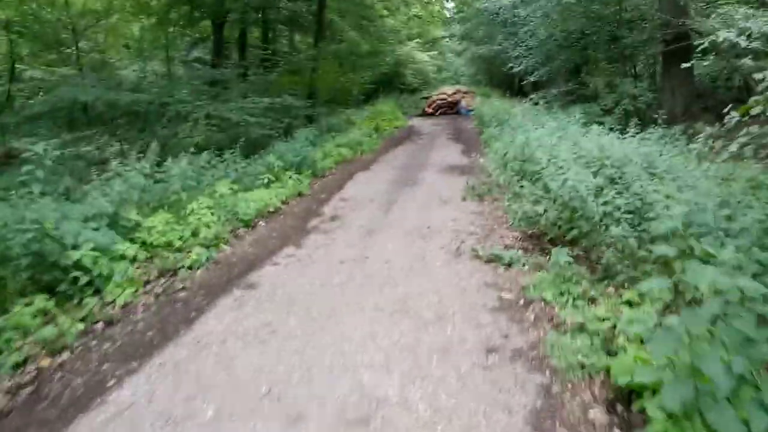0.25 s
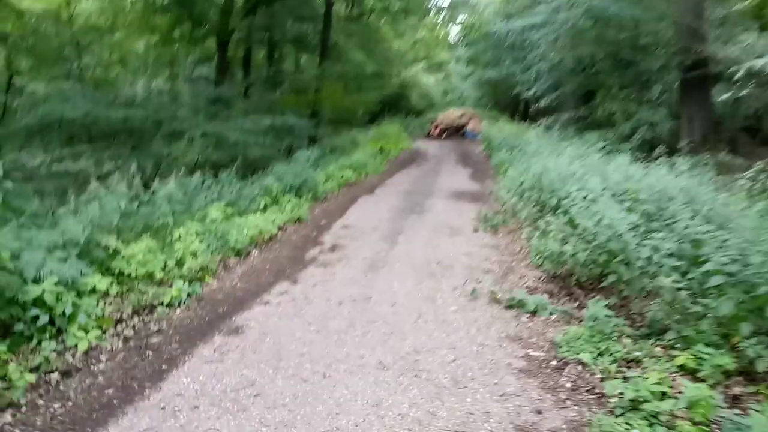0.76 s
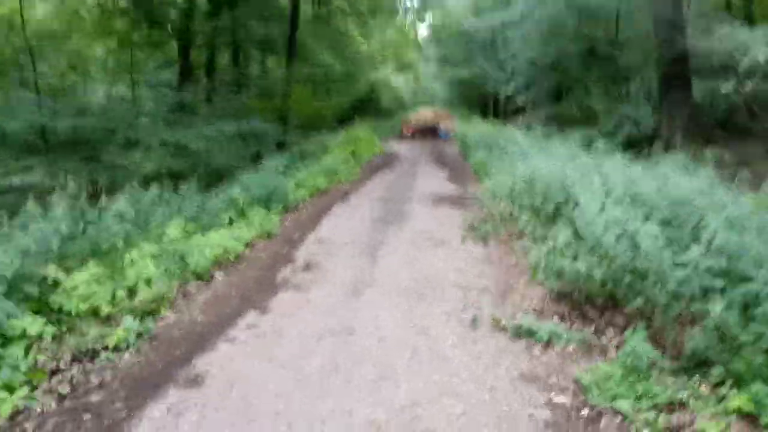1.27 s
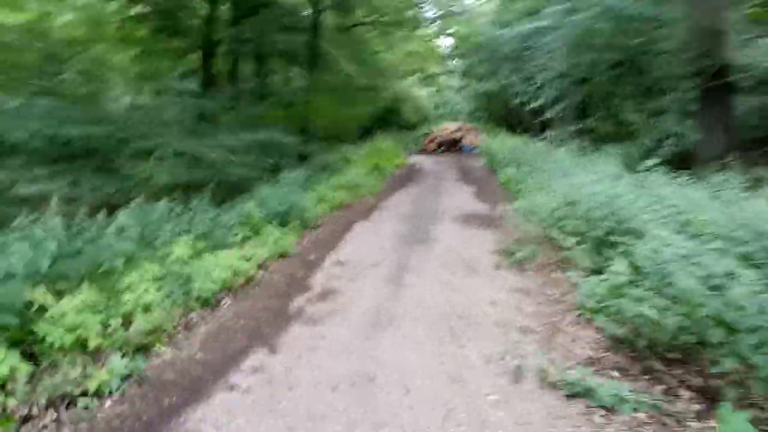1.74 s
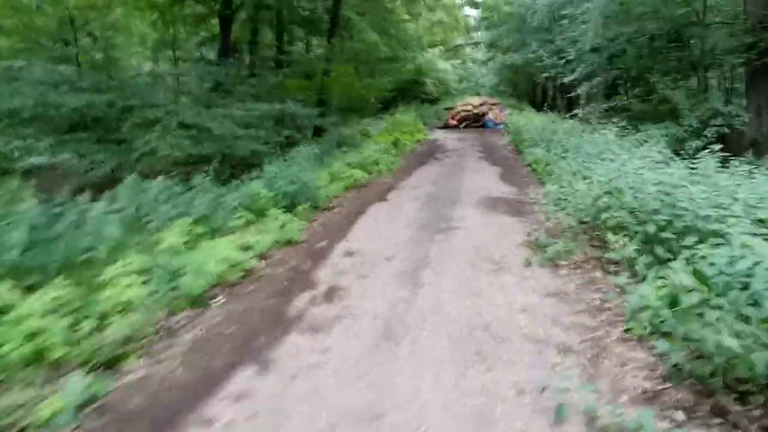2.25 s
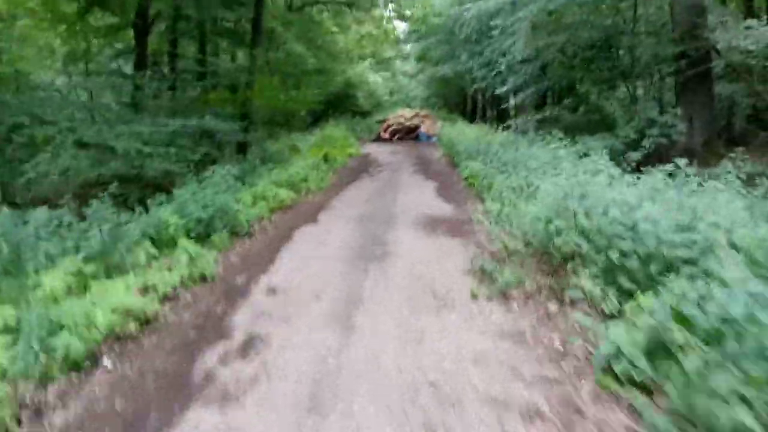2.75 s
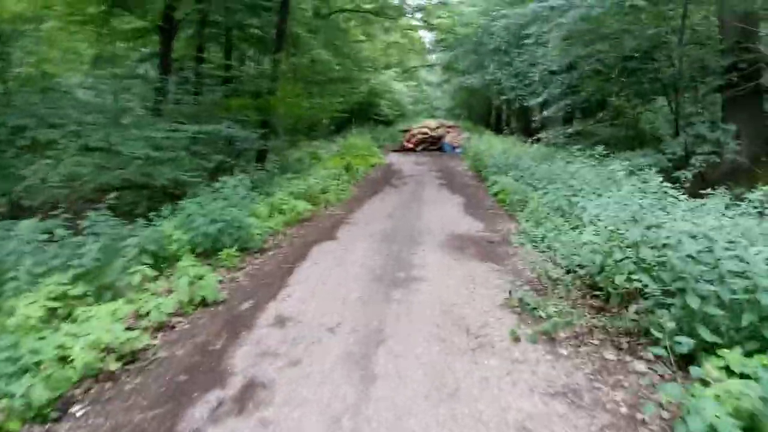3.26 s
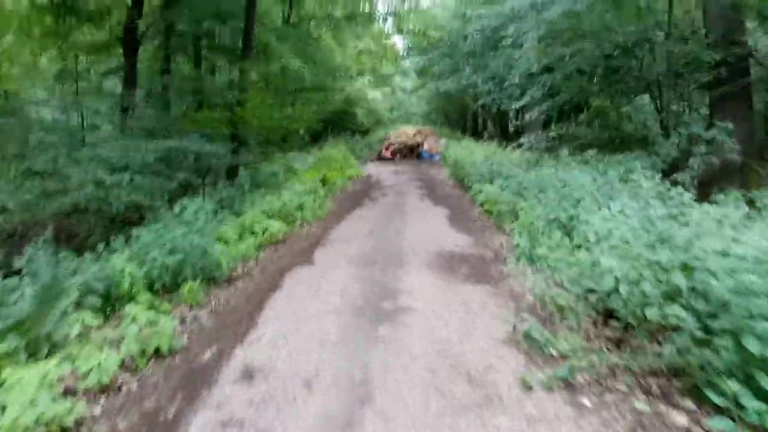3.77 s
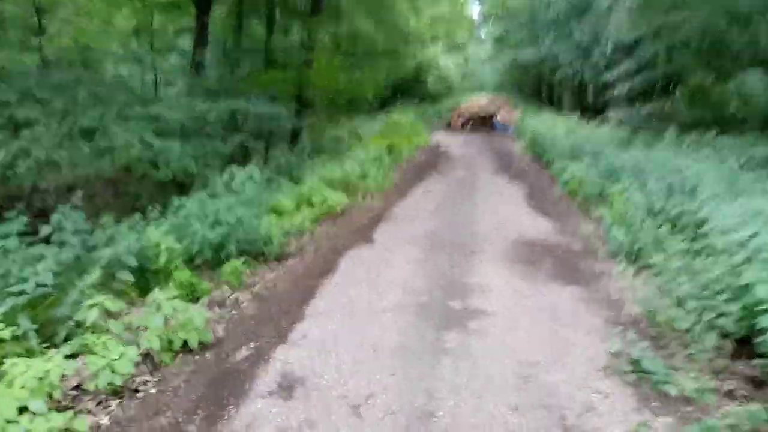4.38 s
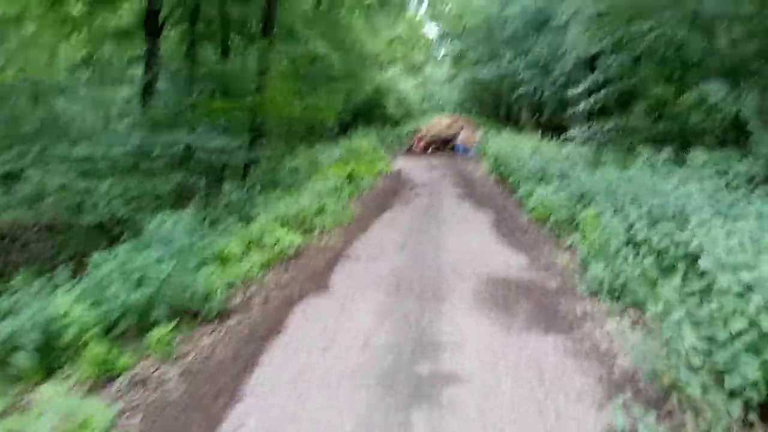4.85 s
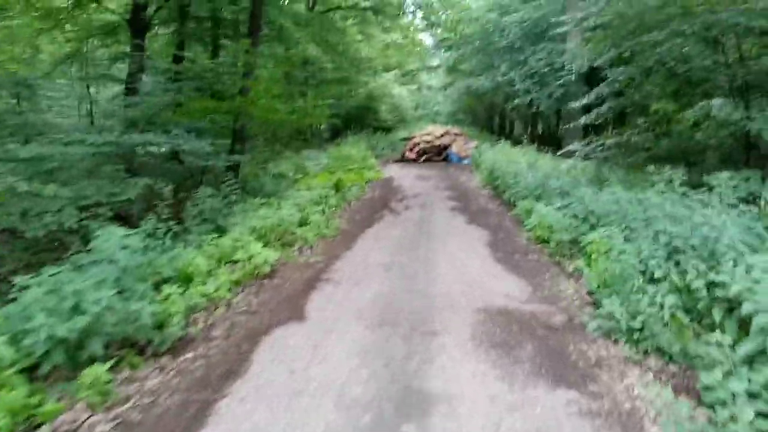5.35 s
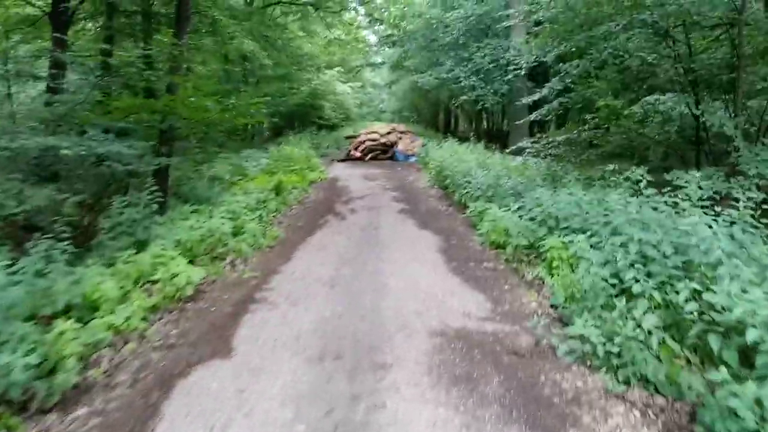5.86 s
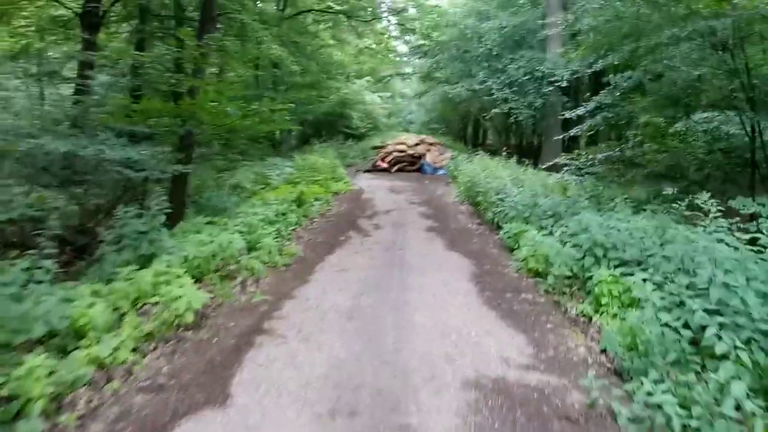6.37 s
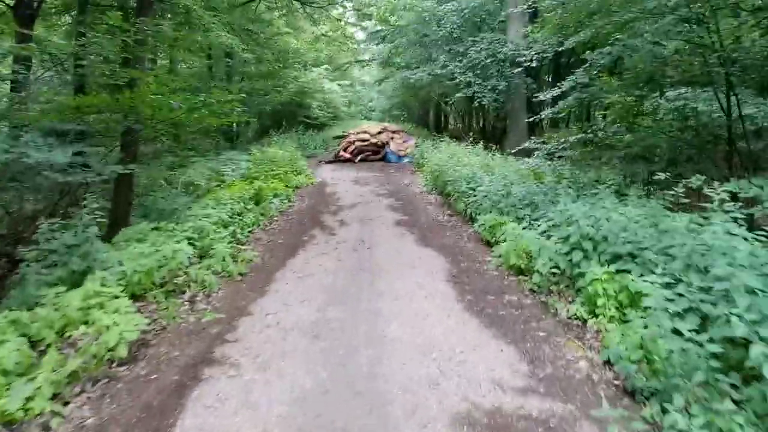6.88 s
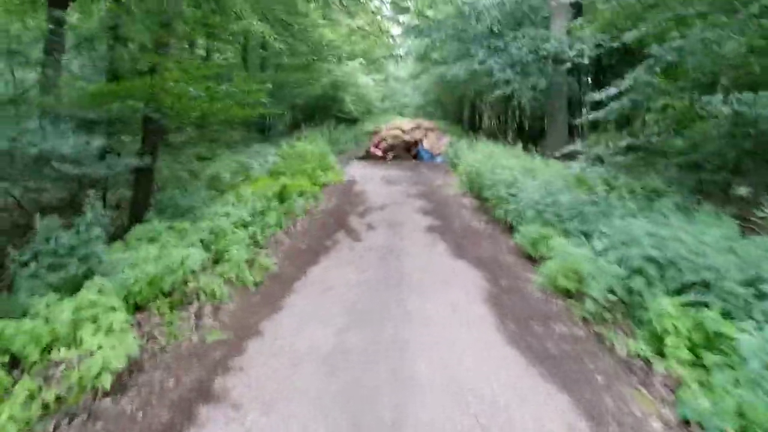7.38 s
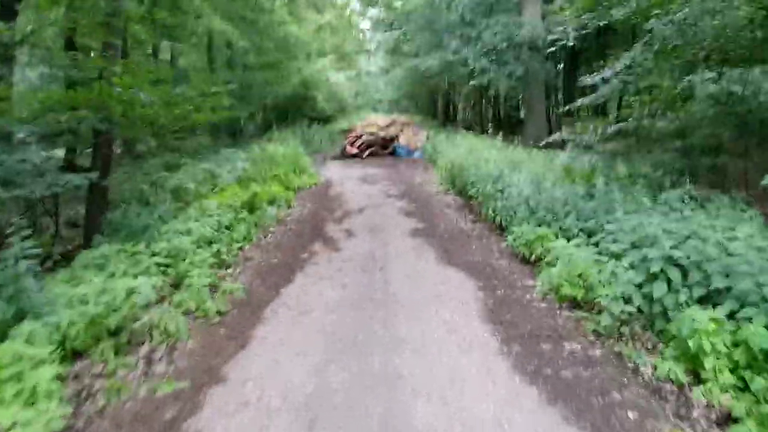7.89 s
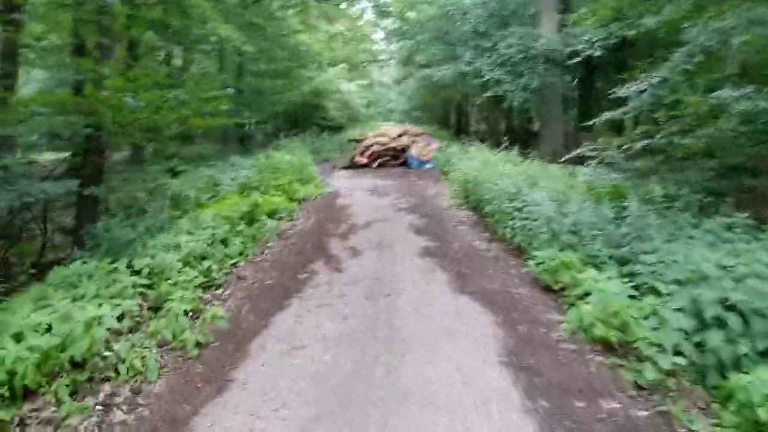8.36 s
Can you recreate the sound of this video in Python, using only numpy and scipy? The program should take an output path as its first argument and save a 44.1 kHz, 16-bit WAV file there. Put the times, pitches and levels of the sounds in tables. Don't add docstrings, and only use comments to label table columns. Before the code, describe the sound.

A walker's shoes press fine gravel about twice a second, each step a soft thud and gritty crunch with small pebble ticks. Birds whistle, chip and chatter nearby, echoing among trees over a blurred distant chorus. Sticks knock sharply early on; later a twig snaps loudly close by, followed by creaking and clattering wood. Faint rumble, leaf noise and hiss lie beneath, heard in mono from a small handheld microphone.

```python
import sys
import numpy as np
from scipy import signal
from scipy.fft import rfft, irfft, next_fast_len
from scipy.io import wavfile
from scipy.ndimage import uniform_filter1d, map_coordinates

SR = 44100
rng = np.random.default_rng(int(sys.argv[2]) if len(sys.argv) > 2 else 0)


def gain_from_db(level_db):
    decades = np.asarray(level_db, float) / 20
    return 10 ** decades


def wrap_up_sound(samples):
    columns = np.atleast_2d(samples).T
    tamed = np.clip(columns, -1, 1)
    steps = np.round(tamed * 32767).astype(np.int16)
    wavfile.write(sys.argv[1], SR, steps)


N = 380297


def unit(x):
    return x / np.sqrt(np.mean(x ** 2))


def colour(x, points):
    hz, db = np.transpose(points)
    size = next_fast_len(N)
    axis = np.log(np.arange(size // 2 + 1) * SR / size + 1)
    gain = gain_from_db(np.interp(axis, np.log(hz), db))
    return irfft(rfft(x, size) * gain, size)[:N]


def walk(rate_hz):
    hold = int(SR / rate_hz)
    steps = np.repeat(rng.standard_normal(N // hold + 1), hold)
    return 1.318 * uniform_filter1d(uniform_filter1d(steps, hold), hold)[:N]


def add(out, s, sound):
    i = int(s * SR)
    out[i:i + len(sound)] += sound[:N - i]


def ring(hz, t60_s, rise_cycles=0.2):
    t = np.arange(SR // 16) / SR
    contact = 1 - np.exp(-t * hz / rise_cycles)
    decay = np.exp(-np.log(1000) * t / t60_s)
    y = contact * decay * np.sin(2 * np.pi * hz * t)
    return y / np.abs(y).max()


def whistle(length_s, hz, waver, lean=0.57):
    flutter_db, wobble = 4.0, 0.007
    u = np.linspace(-1, 1, int(length_s * SR))
    start, middle, end = hz
    pitch = middle + (end - start) / 2 * u + ((start + end) / 2 - middle) * u ** 2
    shake = waver[:len(u)]
    swell = np.clip(1 - u ** 2, 0, 1) ** 0.46 * np.exp(-lean * u)
    phase = 2 * np.pi * np.cumsum(pitch * (1 + wobble * shake)) / SR
    return 2.14 * swell * gain_from_db(flutter_db * shake[::-1]) * np.sin(phase)


def birds(song, lean=0.6):
    out, waver = np.zeros(N), np.tile(walk(150), 2)
    for s, length, *hz, db in song:
        shake = min(length / 0.1, 1) * waver[int(s * SR):][:SR // 4]
        add(out, s, gain_from_db(db) * whistle(length, hz, shake, lean))
    return out


def slurred(s, length, hz, slide, db):
    return s, length, hz - slide / 2, hz, hz + slide / 2, db


def trunks(x, count=2):
    wood_t60_s, treble_t60_s, sway_samples = 0.7, 0.46, 35.0
    t = np.arange(int(1.1 * SR)) / SR
    build = 1 - np.exp(-t / 0.015)
    wood_decay, treble_decay = gain_from_db(-60 * t / wood_t60_s), gain_from_db(-60 * t / treble_t60_s)
    low = signal.butter(2, 6500, fs=SR, output="sos")
    out = 0
    for _ in range(count):
        noise = rng.standard_normal(len(t))
        dull = signal.sosfilt(low, noise)
        tail = build * (dull * wood_decay + (noise - dull) * treble_decay)
        heard = signal.fftconvolve(x, tail)[:N]
        out = out + map_coordinates(heard, [np.arange(N) + sway_samples * walk(7)], order=2)
    return out / np.sqrt(count * np.sum((build * wood_decay) ** 2))


def foliage(x):
    spread_s, direct = 0.0082, 0.49
    t = np.arange(SR // 16) / SR
    spray = rng.standard_normal(len(t)) * np.exp(-t / spread_s)
    spray = spray / np.sqrt(np.sum(spray ** 2))
    return direct * x + 0.5 * signal.fftconvolve(x, spray)[:N]


# start in seconds, length in seconds, level in dB.
SCUFFS = [
    (0, 0.072, -58.5),
    (2.541, 0.088, -60.5),
    (4.662, 0.12, -65),
    (8.129, 0.11, -61),
]
# start in seconds, heel level in dB, heel ring in Hz, sole roll in seconds, grit level in dB.
FOOTFALLS = [(.482, -48.5, 103, 0.2, -60.5), (1.009, -47, 164, 0.19, -63), (1.558, -42.5, 145, 0.22, -63),
             (2.079, -55, 159, 0.3, -62), (2.628, -41.5, 115, .22, -59.5), (3.161, -41.5, 148, 0.18, -58.5),
             (3.72, -50, 202, 0.19, -60), (4.337, -60, 159, 0.085, -59.5), (4.795, -46, 205, 0.17, -59.5),
             (5.398, -66, 150, 0.16, -63.5), (5.894, -64, 150, 0.19, -64.5), (6.418, -50, 167, .23, -63.5),
             (6.99, -58, 104, 0.2, -65), (7.47, -62, 150, .31, -67), (7.979, -47, 191, 0.14, -60.5),
             (8.533, -66, 150, 0.098, -76)]
# frequency in Hz, density in dB per Hz.
GRIT = [(200, 0), (500, 9), (1000, -3), (2000, 0), (3500, -3), (6000, 1), (8000, -11), (10000, -40),
        (14000, -49)]


def grit():
    press = np.zeros(N)
    rolls = [(s, roll, db) for s, _, _, roll, db in FOOTFALLS]
    for s, length, db in SCUFFS + rolls:
        u = np.linspace(0, 1, int(length * SR))
        add(press, s, gain_from_db(db + 3) * np.sin(np.pi * u ** 0.48) ** 0.72)
    out = 0.5 * rng.standard_normal(N)
    for hz, grains_per_s in [(900, 500), (2000, 600), (3800, 700), (6500, 1200)]:
        hits = rng.random(N) < grains_per_s / SR
        size_db = np.minimum(2.7 * rng.exponential(size=N), 7)
        grains = hits * gain_from_db(size_db) * np.sign(rng.standard_normal(N))
        stone = signal.butter(2, [hz / 1.67, hz * 1.54], "band", fs=SR, output="sos")
        out = out + signal.sosfilt(stone, unit(grains))
    flicker_db = 1.6 * walk(40)
    return press * gain_from_db(flicker_db) * unit(colour(out, GRIT))


# frequency in Hz, density in dB per Hz.
AIR = [(20, -30), (30, -11), (68, 3), (96, 1.5), (358, -4), (532, -11), (1790, -23), (2600, -22.5),
       (5000, -17.5), (7000, -21.5), (8100, -35.5), (9000, -40), (13600, -48.5)]
# frequency in Hz, density in dB per Hz.
HISS = [(12500, -26), (13800, -17), (14900, -4), (15700, -1)]


def air():
    air_db, hiss_db = -57, -80.5
    noise = unit(colour(rng.standard_normal(N), AIR))
    bass = signal.sosfilt(signal.butter(2, 450, fs=SR, output="sos"), noise)
    hiss = unit(colour(rng.standard_normal(N), [(9000, -60)] + HISS + [(16500, -60)]))
    bass_gain = gain_from_db(1.3 * walk(1.73) + 2.76 * walk(14))
    return gain_from_db(hiss_db + 1.2 * walk(12)) * hiss + gain_from_db(air_db) * (noise + (bass_gain - 1) * bass)


# time in seconds, high singers in dB, low singers in dB.
FLOCKS = [(0.0, -60.5, -59.5), (.96, -56.5, -66), (1.7, -56.5, -59.5), (2.5, -57, -62.5),
          (3.29, -58, -57.5), (4.05, -59.5, -62), (4.27, -50, -62), (4.56, -56, -63.5), (4.85, -54, -61.5),
          (5.14, -59.5, -59.5), (5.71, -62.5, -66.5), (6.05, -62, -83), (6.42, -59, -64), (6.72, -60, -66),
          (7.03, -59, -57.5), (7.55, -60, -60.5), (7.88, -64, -59.5), (8.62, -62, -62.5)]
# frequency in Hz, density in dB per Hz.
HIGH_CHORUS = [(3500, -12), (4300, 4), (6000, -0.5), (7200, -7), (8200, -33.5)]
# frequency in Hz, density in dB per Hz.
LOW_CHORUS = [(1700, -47), (2500, -5), (3700, 4.5), (4400, -26.5)]


def chorus():
    s, *columns = np.transpose(FLOCKS)
    high_db, low_db = (np.interp(np.arange(N) / SR, s, c) for c in columns)
    out, waver = np.zeros(N), walk(147.7)
    for when, long, pitch, slur in rng.random((1400, 4)):
        bend = np.sign(slur - 0.6) * (0.0908 + 0.1184 * slur)
        hz = 1900 * 4.2 ** pitch * (1 + bend * np.arange(-1, 2))
        add(out, when * N / SR, whistle(0.012 + 0.0301 * long, hz, waver))
    blur = 0.68 * unit(trunks(out, count=1)) + rng.standard_normal(N)
    high, low = unit(colour(blur, HIGH_CHORUS)), unit(colour(blur, LOW_CHORUS))
    return gain_from_db(high_db - 1.0) * high + gain_from_db(low_db - 4.5) * low


# centre in seconds, peak in dB.
RUSTLES = [(.0623, -70), (.53, -70), (.595, -75), (2.0238, -69), (2.68, -71), (3.2194, -64), (3.3842, -67),
           (3.46, -66), (3.7928, -73), (3.9055, -70), (4.386, -64), (4.844, -68), (6.5625, -73), (7.8, -71),
           (8.11, -75)]


def rustle():
    swell = np.zeros(N)
    for s, db in RUSTLES:
        add(swell, s - 0.01, gain_from_db(db - 0.5) * np.hanning(int(0.041 * SR)))
    points = [(5000, -28), (7500, 15), (10500, -11), (12500, -22), (15000, -30)]
    return swell * unit(colour(rng.standard_normal(N), points))


# start in seconds, peak in dB, ring in Hz.
BUMPS = [
    (0.142, -50, 80.7),
    (5.74, -58, 99.6),
    (8.161, -41.5, 191),
    (8.2, -38.5, 148),
]


def thuds():
    out = np.zeros(N)
    for s, db, hz in BUMPS + [step[:3] for step in FOOTFALLS]:
        add(out, s + 0.00432, -gain_from_db(db + 2.5) * ring(hz, 3.3 / hz, rise_cycles=0.4))
    return out


# start in seconds, length in seconds, pitch in Hz, slide in Hz, level in dB.
SEEPS = [(0.17, 0.13, 6430, -480, -63), (2.032, .06, 7940, -300, -76), (2.146, 0.12, 7420, -260, -65),
         (2.187, .016, 6330, 0, -64), (3.0, .092, 8300, -210, -81), (3.097, 0.062, 8180, 198, -78),
         (3.605, .155, 7270, -100, -66), (3.754, 0.067, 8870, 50, -81), (3.842, .045, 8130, -800, -70.5),
         (4.262, 0.019, 6600, 300, -53), (3.896, .06, 7640, 130, -66), (4.023, .06, 7830, -60, -65),
         (5.186, .03, 7500, -490, -61), (5.209, 0.086, 7430, 380, -54), (5.304, .098, 7440, -50, -63),
         (5.446, 0.037, 7290, -40, -56), (5.483, 0.079, 7400, 256, -54), (7.128, .03, 6920, -200, -68),
         (7.167, 0.079, 6670, -210, -64), (7.8, .24, 8150, -350, -84), (8.52, 0.093, 6430, -50, -65)]
# start in seconds, length in seconds, pitch in Hz, slide in Hz, level in dB.
WARBLE = [(0.276, .041, 4550, -550, -53), (2.219, 0.081, 3630, -200, -65), (2.607, .012, 4070, -300, -47),
          (2.634, 0.03, 3980, 0, -54), (3.525, 0.041, 3830, -300, -55.5), (3.67, 0.04, 3475, 100, -61),
          (4.828, .03, 4410, 40, -56), (4.86, .02, 3750, -300, -56), (5.347, .04, 4090, 0, -66),
          (8.39, 0.032, 3690, 0, -64), (6.09, .04, 3980, 0, -68), (5.156, .024, 3450, -600, -57),
          (6.728, .076, 4360, 0, -62.5), (7.375, 0.085, 4260, -120, -59.5), (7.86, 0.024, 3900, 440, -61),
          (8.547, 0.081, 3620, -30, -64)]
# start in seconds, length in seconds, pitch in Hz, slide in Hz, level in dB.
PIPING = [(2.847, 0.03, 4880, -60, -47), (2.905, .04, 4860, -60, -63), (2.961, 0.073, 4820, -52, -66),
          (3.48, .017, 4970, -50, -51.5), (4.594, 0.052, 5650, -30, -55.5), (4.847, .036, 5320, -240, -54),
          (5.266, .02, 5800, -1500, -51.5), (5.72, .05, 6160, 30, -66), (5.42, .17, 5200, 42, -69),
          (6.87, 0.071, 4870, -60, -61.5), (6.99, .077, 4800, 30, -62.5), (7.523, 0.061, 5270, 310, -54),
          (7.608, .02, 4650, -200, -62), (6.235, .015, 5950, 200, -69)]
# start in seconds, length in seconds, pitch in Hz, slide in Hz, level in dB.
FLUTING = [(2.38, 0.039, 2490, 6, -65.5), (4.025, 0.02, 2860, -30, -63), (4.065, .025, 2850, 0, -63),
           (4.022, 0.065, 2210, -160, -70), (4.33, 0.045, 2750, -900, -60), (4.44, .012, 2800, -200, -59),
           (5.684, .04, 2650, -300, -67), (6.275, .025, 2740, 200, -71), (5.555, .03, 2850, 100, -66),
           (4.385, 0.11, 2350, -100, -70), (4.524, 0.061, 2910, -50, -67), (4.586, 0.051, 2600, 50, -63),
           (4.959, 0.063, 2850, 162, -62), (5.208, .146, 2715, -150, -64)]


def whistlers():
    return [slurred(*note) for note in SEEPS + WARBLE + PIPING + FLUTING]


def stone_hit(s, db, hz, edge_db, cycles):
    edge = gain_from_db(edge_db) * ring(5200, 0.0013)
    body = ring(hz, cycles / hz, rise_cycles=0.48)
    return s + 0.0008, gain_from_db(db + 2.5) * (edge - body)


# start in seconds, peak in dB, ring in Hz.
PEBBLES = [(.311, -52.5, 700), (.493, -45, 2920), (.547, -52, 1500), (1.068, -48, 2160), (1.075, -47, 2300),
           (1.668, -48, 1520), (2.031, -46, 3020), (2.216, -50, 2400), (2.665, -49, 985),
           (3.769, -47, 2290), (3.776, -50, 2300), (4.364, -44, 2700), (5.463, -54, 2050),
           (5.93, -56, 1500), (6.485, -50, 2200), (7.005, -52, 2470), (2.155, -43, 2470),
           (2.638, -48.5, 950), (2.746, -48, 1400), (2.784, -49, 1500), (3.197, -47, 2080),
           (3.222, -43, 2320), (3.526, -50, 720), (3.807, -44, 2800), (4.674, -49, 710), (4.742, -46, 2760),
           (4.804, -50, 1650), (6.114, -51.5, 724), (6.34, -40.5, 2500), (6.413, -51, 2500),
           (6.458, -42, 2520), (7.82, -39.5, 2600)]


def pebbles():
    out = np.zeros(N)
    for s, db, hz in PEBBLES:
        add(out, *stone_hit(s, db, hz, edge_db=-2, cycles=7.6))
    return out


# start in seconds, length in seconds, level in dB.
CHIPS = [
    (.711, 0.034, -56),
    (.831, 0.042, -55.5),
    (.95, .03, -56),
    (1.07, 0.023, -51),
    (1.191, .02, -55),
    (1.308, .034, -55),
    (1.429, 0.033, -58.5),
    (1.541, .034, -56),
    (1.657, .03, -58),
]


def falling_chips():
    top_hz, fall_hz_per_s, early = 6150, 58000, 0.58
    out = []
    for s, length, db in CHIPS:
        fall_hz = fall_hz_per_s * length
        out.append((s, length, top_hz, top_hz - early * fall_hz, top_hz - fall_hz, db))
    return out


# start in seconds, length in seconds, pitch in Hz, level in dB.
FLICKS = [
    (1.497, .015, 6950, -63),
    (1.701, 0.009, 5580, -50),
    (1.841, .012, 5350, -51),
    (1.975, .017, 5760, -52),
    (3.45, .024, 4620, -47.5),
    (3.507, 0.017, 5160, -51),
    (4.092, 0.012, 4950, -51),
    (4.336, .02, 4220, -60),
    (4.678, 0.016, 4300, -50.5),
    (4.737, 0.014, 4440, -50.5),
]


def flicks():
    return [slurred(s, length, hz, 0.196 * hz, db) for s, length, hz, db in FLICKS]


# start in seconds, peak in dB, ring in Hz.
STICKS = [(1.599, -29, 1650), (1.685, -39.5, 1480), (1.645, -45, 2300), (1.6975, -37, 1900),
          (1.6995, -39, 1600), (1.795, -47, 942), (1.905, -46, 1200), (2.252, -37, 2300),
          (2.548, -36, 2550), (2.555, -45, 1920), (2.572, -48, 2400), (2.669, -46, 2600),
          (2.673, -42, 2720), (2.697, -49, 1100), (4.51, -51, 800), (6.545, -49, 1860), (7.489, -46, 2480),
          (8.0134, -33, 1550), (8.0166, -35, 1500), (8.042, -40, 1250), (8.046, -44, 1910),
          (8.1591, -29.5, 1100), (8.166, -46, 1920)]


def sticks():
    out = np.zeros(N)
    for s, db, hz in STICKS:
        add(out, *stone_hit(s, db, hz, edge_db=-16, cycles=3.86))
    return out


# start in seconds, length in seconds, pitch in Hz, scatter in Hz, level in dB.
CHATTER = [(4.7, .16, 4400, 380, -55), (1.6, .15, 4800, 500, -59), (5.1, .13, 3550, 200, -62),
           (2.66, .13, 3980, 120, -57), (4.95, .14, 4550, 126, -57.5), (4.985, .23, 4020, 180, -58),
           (4.745, .1, 3920, 60, -60.5), (3.53, .19, 3650, 250, -58.5), (3.52, 0.15, 5000, 200, -61.5),
           (4.23, .13, 3980, 130, -60), (6.04, .3, 4800, 50, -68)]


def chatter():
    syllable_s, syllables_per_s = 0.013, 60
    out = []
    for s, length, hz, scatter, db in CHATTER:
        for k, (late, pitch, slide, loud) in enumerate(rng.standard_normal((20, 4))):
            when = (k + 0.25 * late) / syllables_per_s
            centre = hz + 0.5 * scatter * pitch
            level_db = db + 3.0 * loud - 3.0 * when / length
            if when < length:
                out.append(slurred(s + when, syllable_s, centre, 2 * scatter * slide, level_db))
    return out


# start in seconds, peak in dB, ring in Hz.
TICKS = [(2.0872, -54, 7760), (2.3564, -60, 7500), (2.7565, -39, 4100), (3.8072, -40, 4500),
         (4.3651, -39, 4460), (5.4054, -49, 7530), (6.0761, -49, 8350), (6.5116, -42.5, 4440),
         (6.9691, -34, 4560), (7.1422, -48, 7500), (7.9544, -50, 4900), (7.9546, -50, 2900),
         (8.1240, -49, 4300), (8.1319, -43, 4500), (8.1434, -46, 4820), (8.1503, -36.5, 4750),
         (8.1505, -45, 6600), (8.1588, -37, 4000), (8.159, -43, 6200)]


def ticks():
    out = np.zeros(N)
    for s, db, hz in TICKS:
        add(out, s + 0.000985, gain_from_db(db + 2.0) * ring(hz, 13.0 / hz, rise_cycles=0.62))
    return out


# start in seconds, length in seconds, pitch in Hz, slide in Hz, level in dB.
SWELLS = [
    (5.285, 0.091, 5190, 202, -52),
    (5.905, .095, 5230, 220, -65),
    (7.66, 0.039, 5300, 420, -57.5),
    (3.355, .095, 3800, -60, -62),
    (2.26, .18, 7180, -100, -61),
    (5.2, .085, 5170, 100, -60.5),
    (6.008, .03, 2200, 250, -71),
    (3.895, .045, 3800, -120, -61),
]


def swells():
    return birds([slurred(*note) for note in SWELLS], lean=-0.56)


# start in s, length in s, start in Hz, middle in Hz, end in Hz, level in dB.
TURNS = [
    (4.104, .018, 4350, 3850, 3800, -49),
    (4.121, .013, 3900, 4250, 3950, -46),
    (4.148, .011, 3850, 3700, 3650, -51),
    (4.16, .008, 4200, 3950, 3800, -52),
    (4.197, .014, 3850, 4000, 3980, -48),
    (4.212, .014, 3800, 4100, 4650, -46),
    (4.256, .007, 3700, 3900, 4200, -53),
    (2.489, .013, 4650, 5150, 4950, -48),
    (2.502, .016, 4200, 4000, 3950, -51),
    (2.518, .009, 4150, 4100, 3900, -47),
]


def turns():
    return birds(TURNS)


# (length in s, start in Hz, middle in Hz, end in Hz).
ROWS = [
    ((2.748, .1, 4, -56.5), (.018, 3480, 3120, 2720)),
    ((2.93, .103, 2, -53), (.014, 3600, 4400, 4200)),
]


def chip_rows():
    out = []
    for (s, period, chips, db), chip in ROWS:
        out += [(s + k * period, *chip, db) for k in range(round(chips))]
    return out


# start in seconds, pitch in Hz, level in dB.
ZIPS = [
    (4.014, 6600, -63),
    (4.275, 4950, -48),
    (4.43, 5850, -47),
    (4.688, 4900, -52),
    (4.582, 6340, -50),
    (4.662, 6270, -53.5),
]


def zips():
    return [slurred(s, 0.011, hz, 0.305 * hz, db) for s, hz, db in ZIPS]


# start in seconds, foot in Hz, crest in Hz, climb in seconds, level in dB.
ARCHES = [
    (4.218, 8500, 10150, .027, -55.5),
    (4.859, 6200, 8300, .024, -51.5),
]


def arches():
    early, climb_db, fall_s, end_hz = 0.82, -6.5, 0.012, 5950
    out = []
    for s, foot, crest, climb, db in ARCHES:
        out.append((s, climb, foot, foot + early * (crest - foot), crest, db + climb_db))
        out.append(slurred(s + climb, fall_s, (crest + end_hz) / 2, end_hz - crest, db))
    return out


# frequency in Hz, peak in dB, t60 in seconds.
SNAP = [
    (144, -32, 0.037),
    (980, -18, 0.002),
    (1550, -23, 0.0035),
    (3580, -13.5, 0.0022),
    (6430, -18.5, 0.0016),
    (10100, -24, 0.001),
    (12400, -24, .001),
    (15000, -24, 0.001),
]


def snap():
    out = np.zeros(N)
    for hz, db, t60 in SNAP:
        add(out, 7.7142, np.sign(5000 - hz) * gain_from_db(db) * ring(hz, t60, rise_cycles=0.94))
    return out


# start in Hz, end in Hz, level in dB.
CREAK = (2600, 1020, -40.5)


def creak():
    start_s, length_s = 7.980, 0.013
    start_hz, end_hz, db = CREAK
    out = np.zeros(N)
    for u in (np.arange(12) + rng.random(12)) / 12:
        s = start_s + u * length_s
        hz = start_hz * (end_hz / start_hz) ** min(u / 0.65, 1)
        add(out, s, gain_from_db(db + 5.5 * u) * ring(hz, 0.0035))
        add(out, s, gain_from_db(db - 6.0 * u - 5) * ring(3300 + 1500 * (1 - u), 0.002))
    return out


# frequency in Hz, gain in dB.
MIC = [(30, -31), (70, 1.5), (6500, 1.5), (8500, -3.5), (11000, -10), (15000, -10)]


def knocks():
    return colour(thuds() + pebbles() + sticks() + ticks() + snap() + creak(), MIC)


def scene():
    feet = knocks() + grit()
    song = birds(whistlers() + flicks() + zips() + arches() + chatter()) + swells()
    chips = birds(chip_rows() + falling_chips())
    bent = turns()
    direct = feet + gain_from_db(-5) * bent + gain_from_db(-9) * chips
    near_echo = foliage(song + gain_from_db(-3) * bent + gain_from_db(-4) * chips)
    wood_echo = trunks(gain_from_db(-9) * bent + gain_from_db(-3.5) * song + gain_from_db(-4.0) * chips + gain_from_db(-33) * feet)
    mono = direct + near_echo + wood_echo + chorus() + rustle() + air()
    return np.array([mono, mono])


def band_limit(x):
    return signal.sosfilt(signal.butter(12, 16800, fs=SR, output="sos"), x)


def record(dry):
    top = signal.ellip(10, 0.2, 60, 15740, fs=SR, output="sos")
    mix = signal.sosfilt(top, dry)
    return band_limit(mix)


dry = scene()
out = record(dry)
wrap_up_sound(out)
```